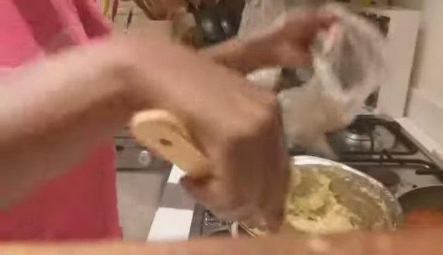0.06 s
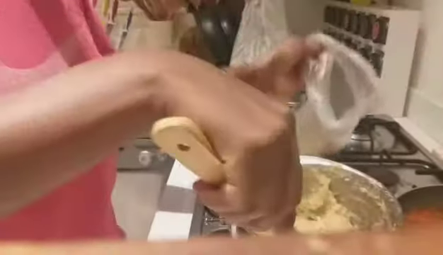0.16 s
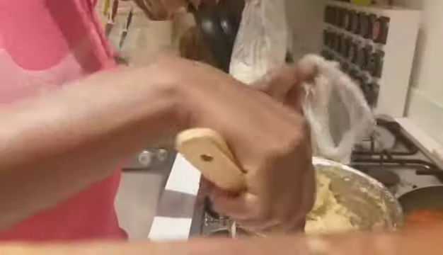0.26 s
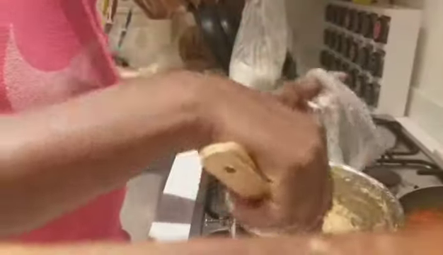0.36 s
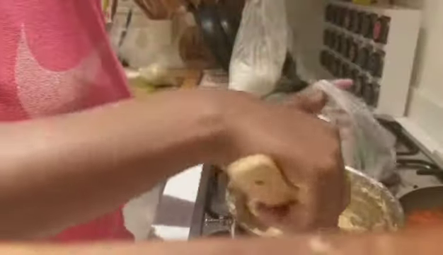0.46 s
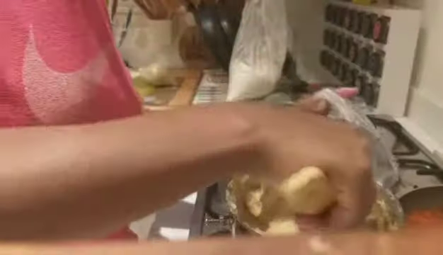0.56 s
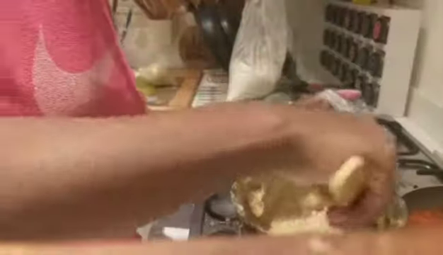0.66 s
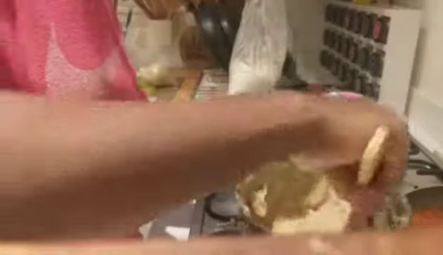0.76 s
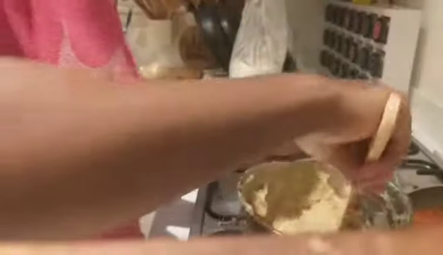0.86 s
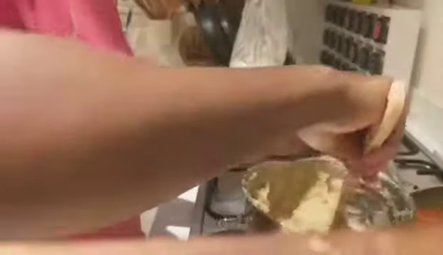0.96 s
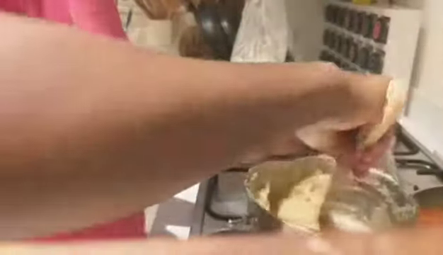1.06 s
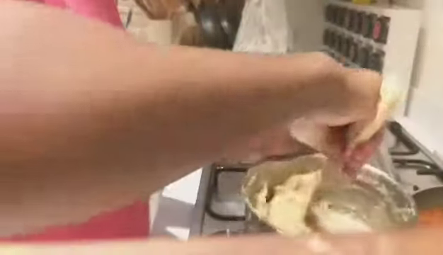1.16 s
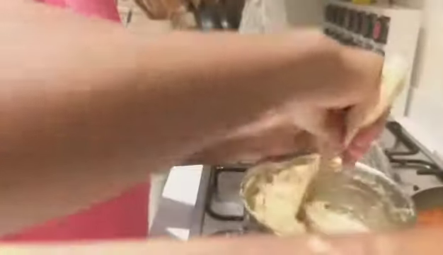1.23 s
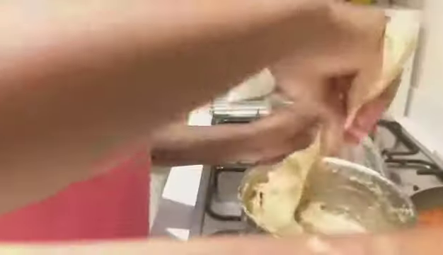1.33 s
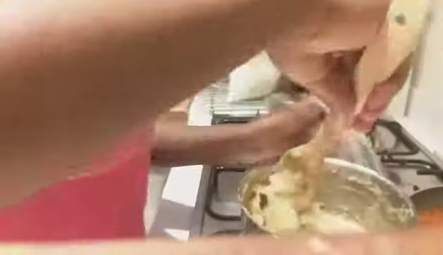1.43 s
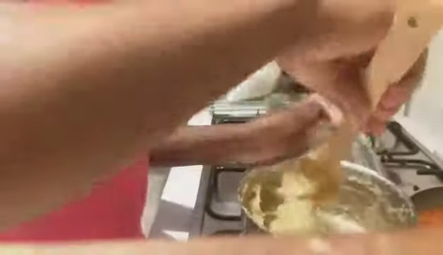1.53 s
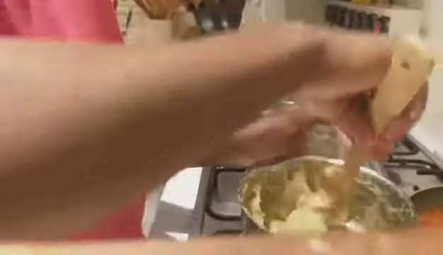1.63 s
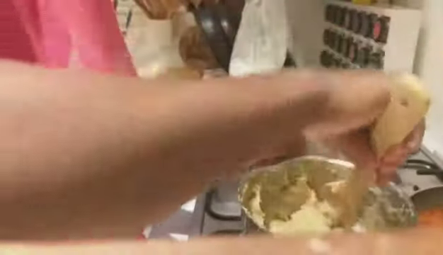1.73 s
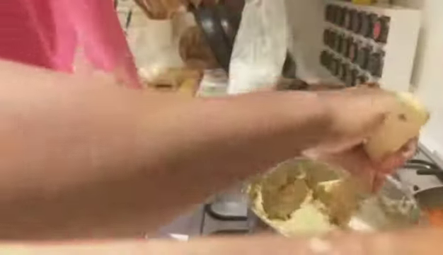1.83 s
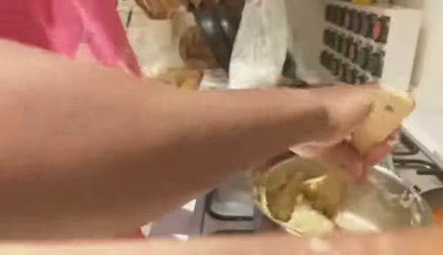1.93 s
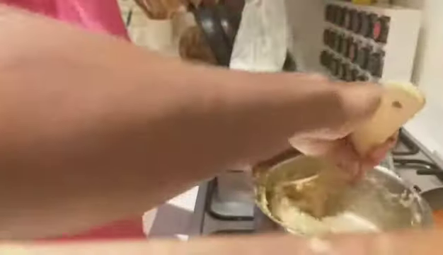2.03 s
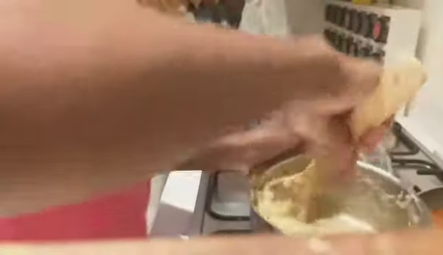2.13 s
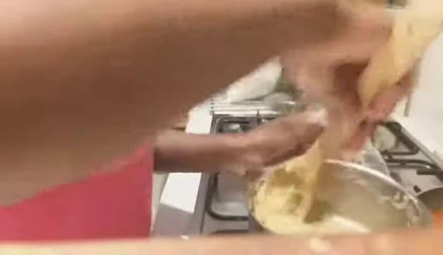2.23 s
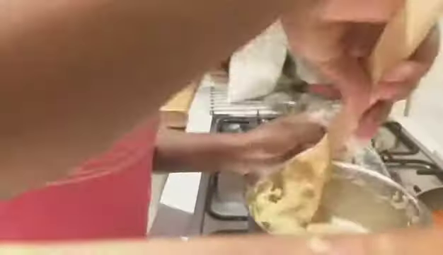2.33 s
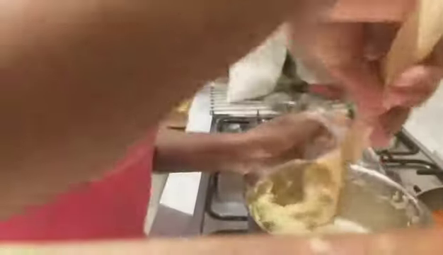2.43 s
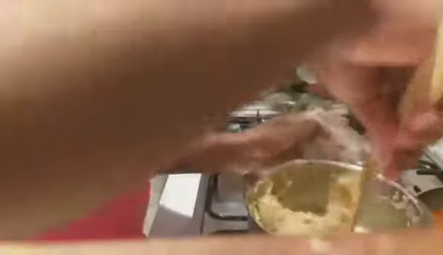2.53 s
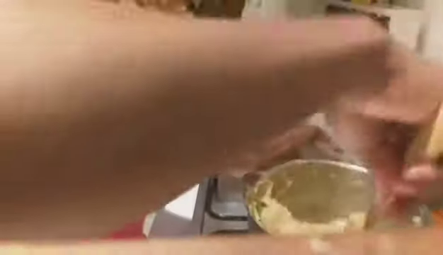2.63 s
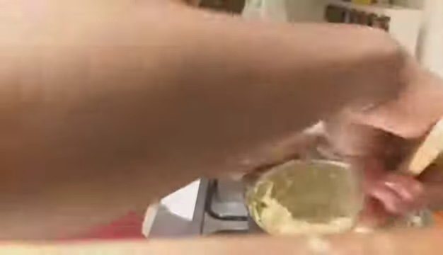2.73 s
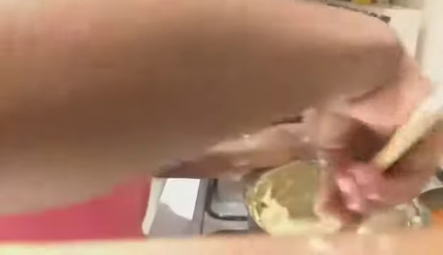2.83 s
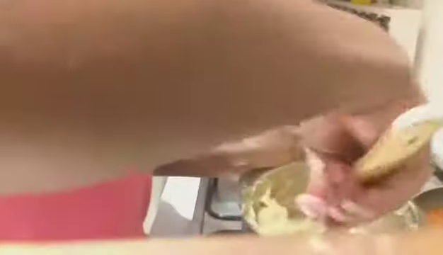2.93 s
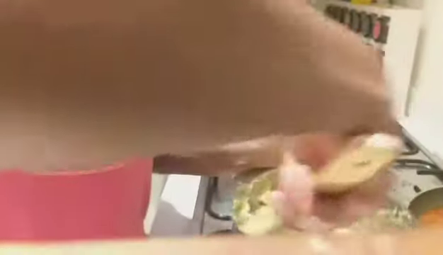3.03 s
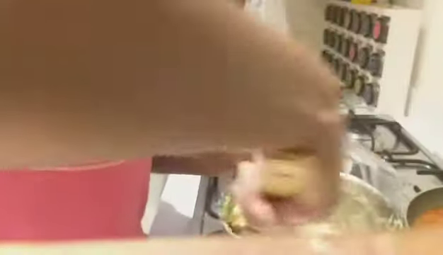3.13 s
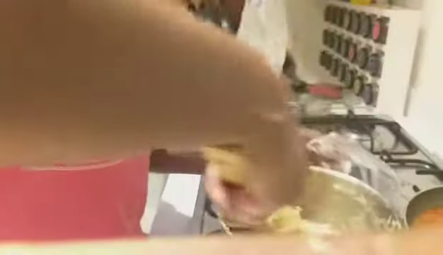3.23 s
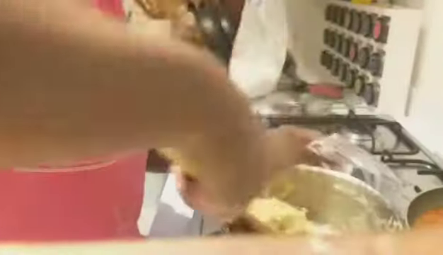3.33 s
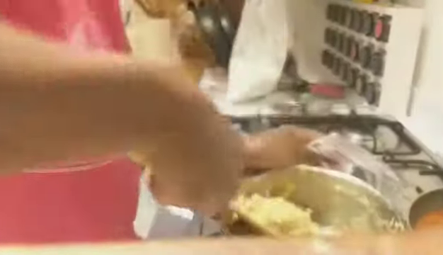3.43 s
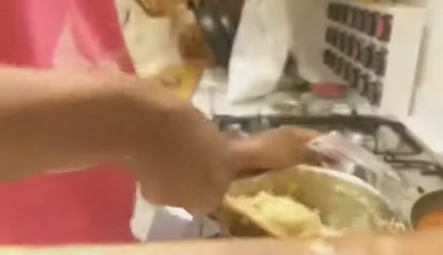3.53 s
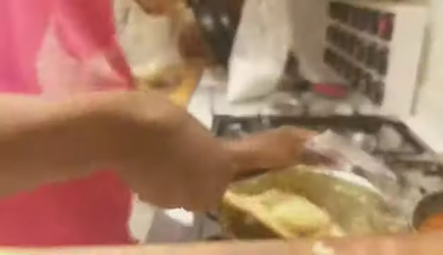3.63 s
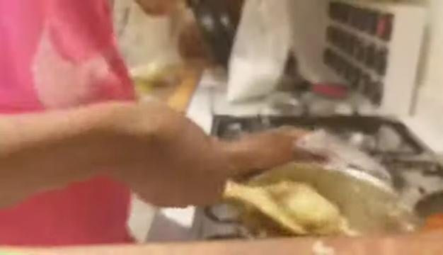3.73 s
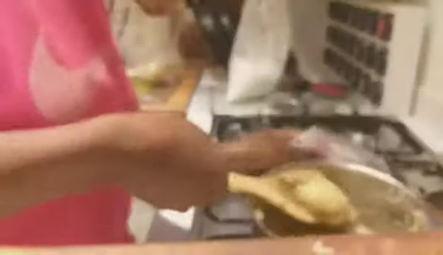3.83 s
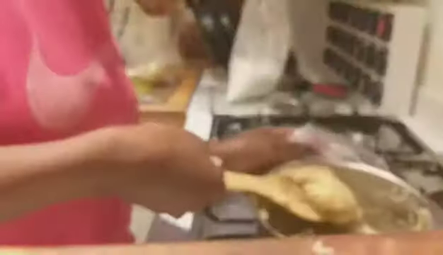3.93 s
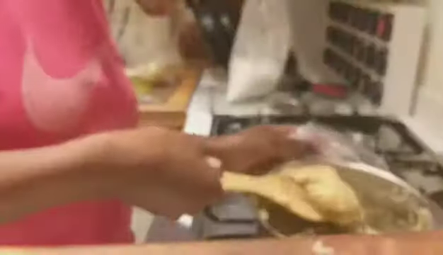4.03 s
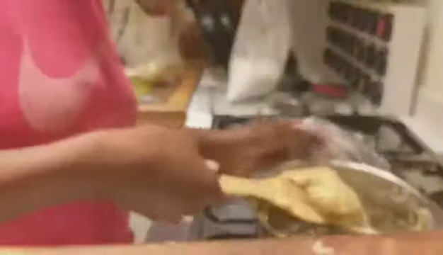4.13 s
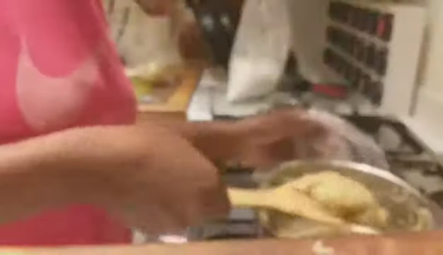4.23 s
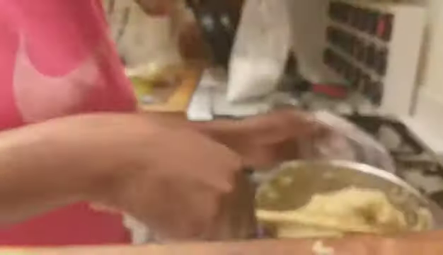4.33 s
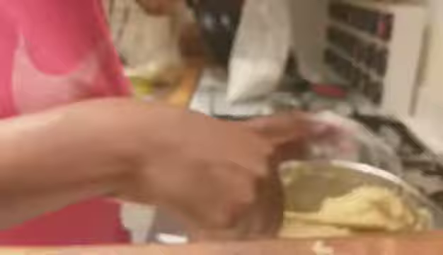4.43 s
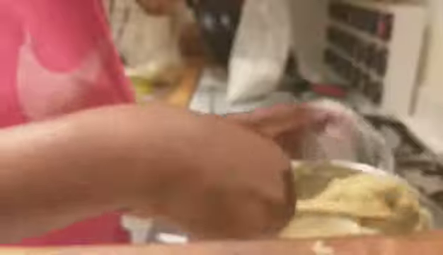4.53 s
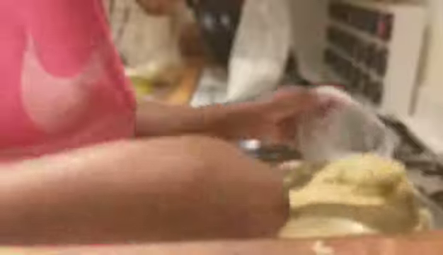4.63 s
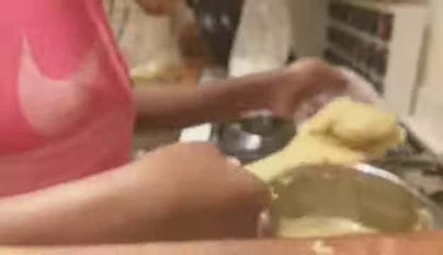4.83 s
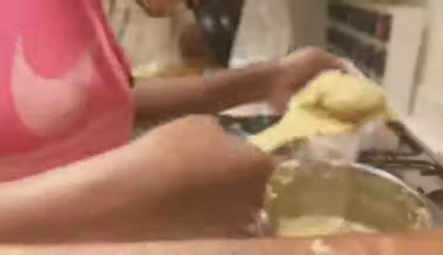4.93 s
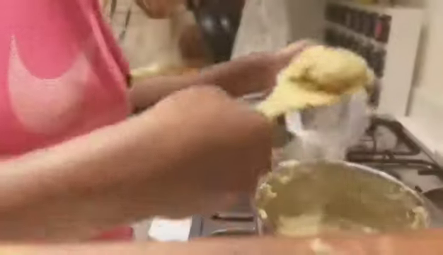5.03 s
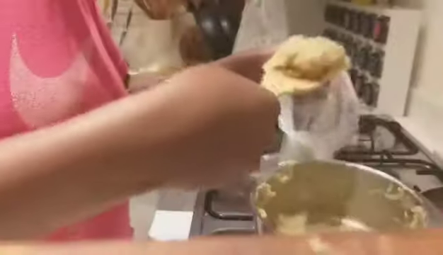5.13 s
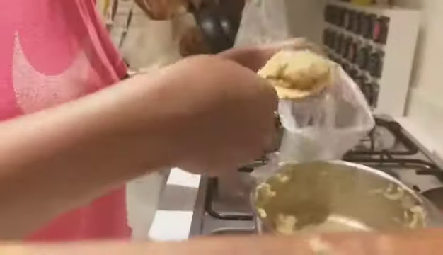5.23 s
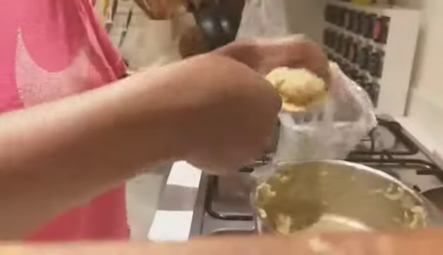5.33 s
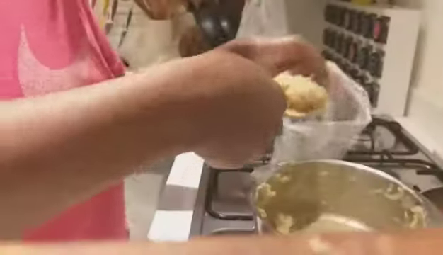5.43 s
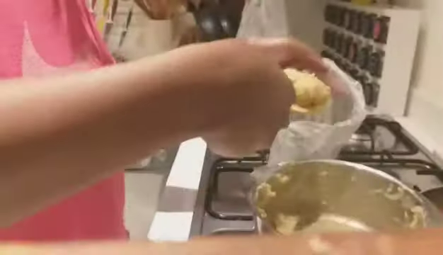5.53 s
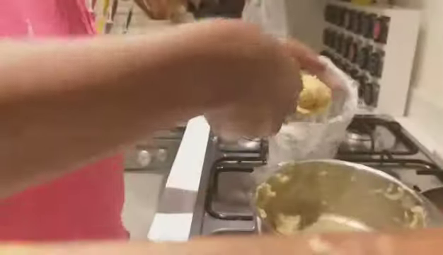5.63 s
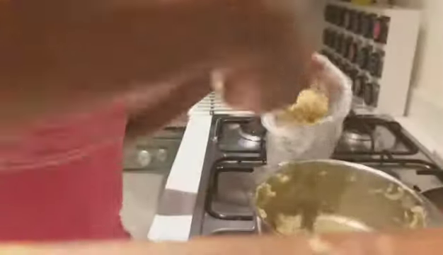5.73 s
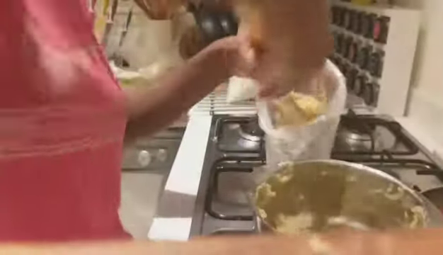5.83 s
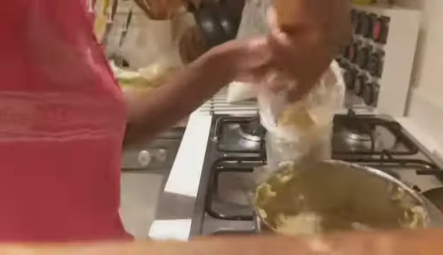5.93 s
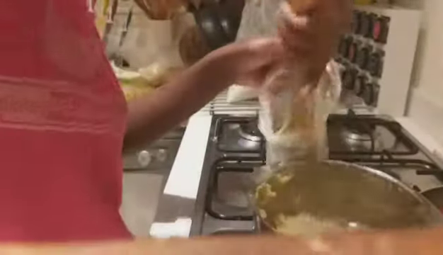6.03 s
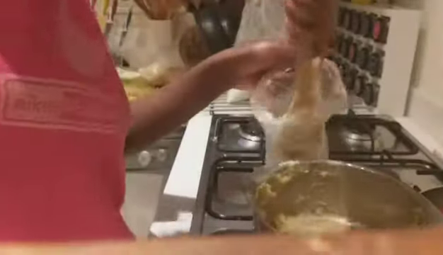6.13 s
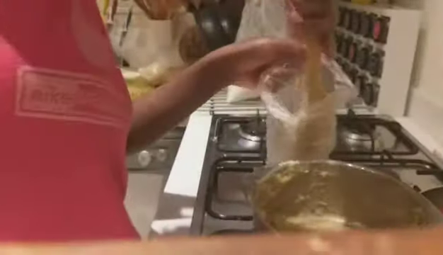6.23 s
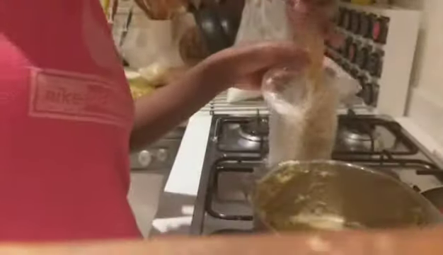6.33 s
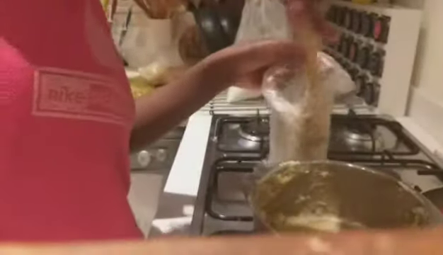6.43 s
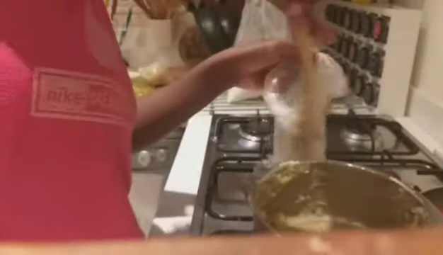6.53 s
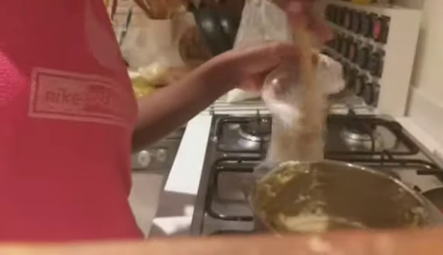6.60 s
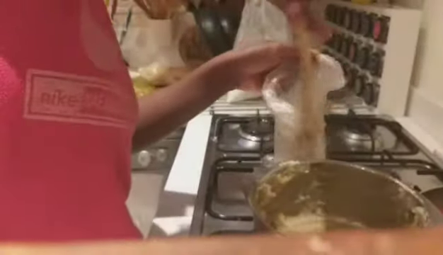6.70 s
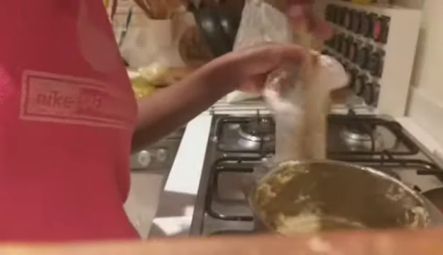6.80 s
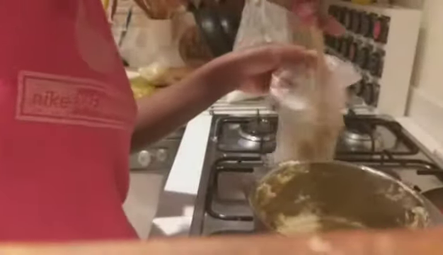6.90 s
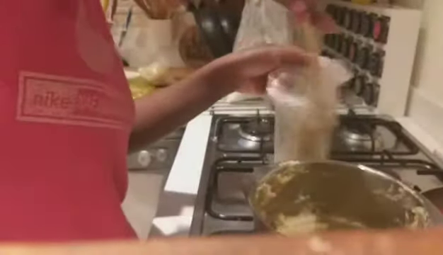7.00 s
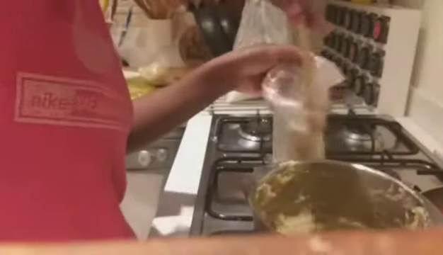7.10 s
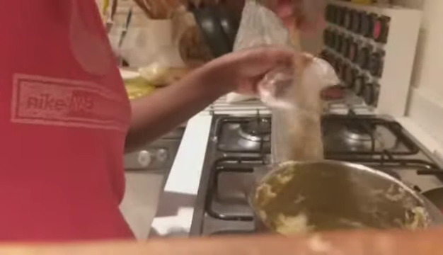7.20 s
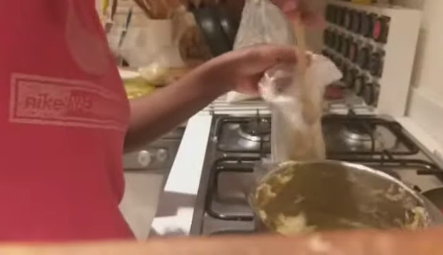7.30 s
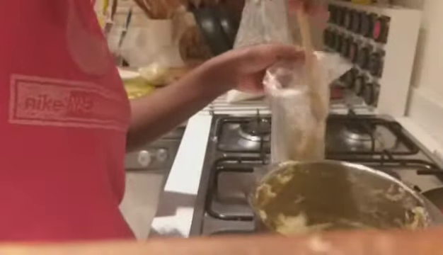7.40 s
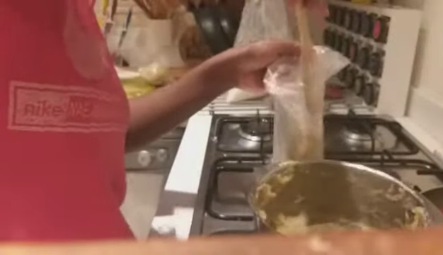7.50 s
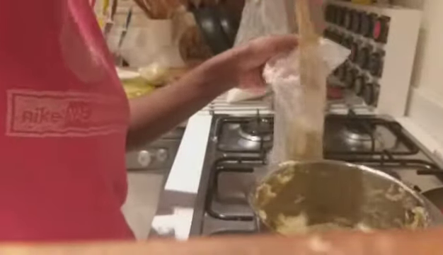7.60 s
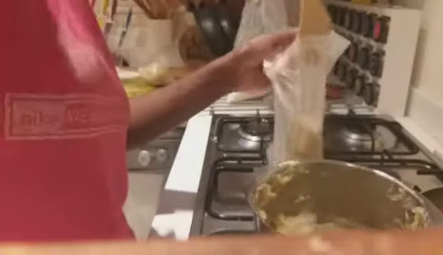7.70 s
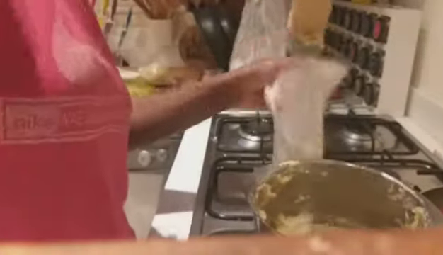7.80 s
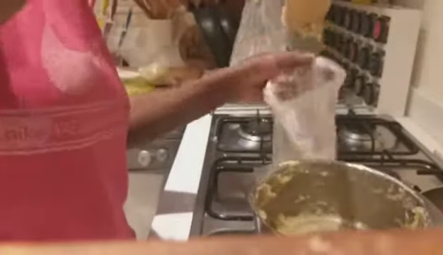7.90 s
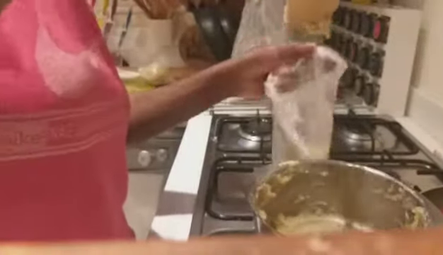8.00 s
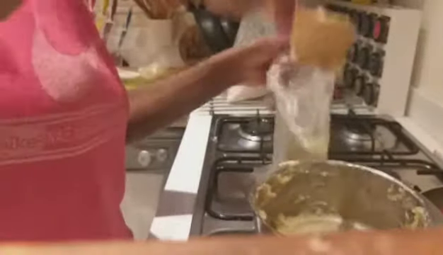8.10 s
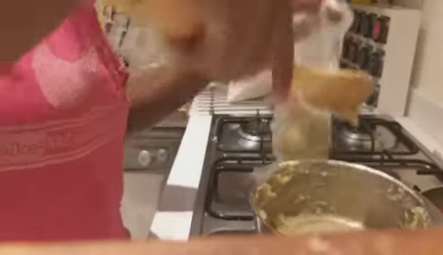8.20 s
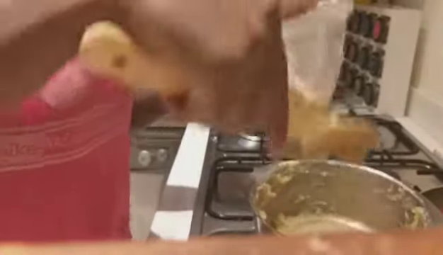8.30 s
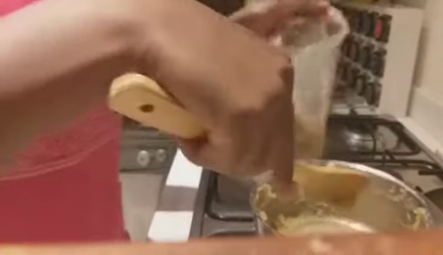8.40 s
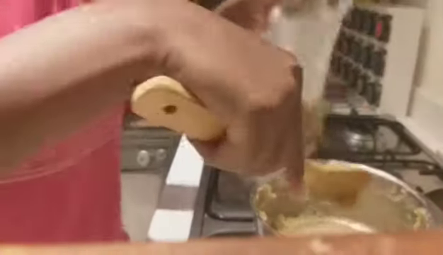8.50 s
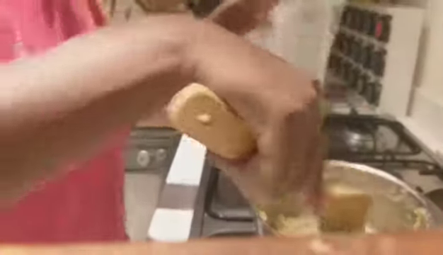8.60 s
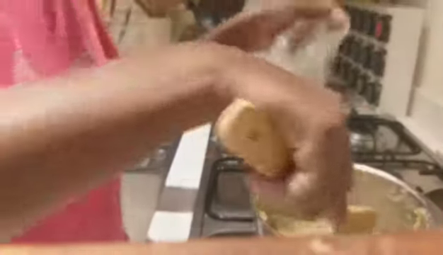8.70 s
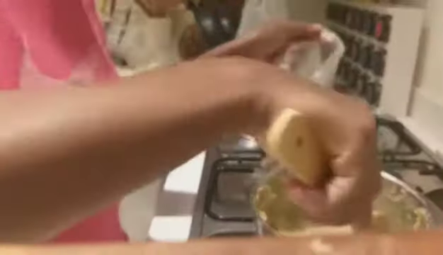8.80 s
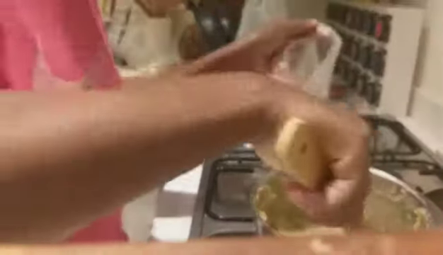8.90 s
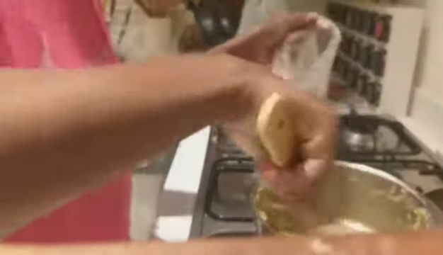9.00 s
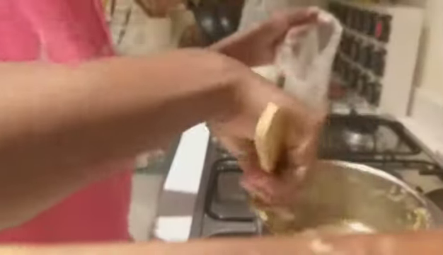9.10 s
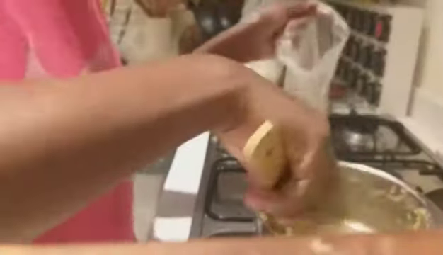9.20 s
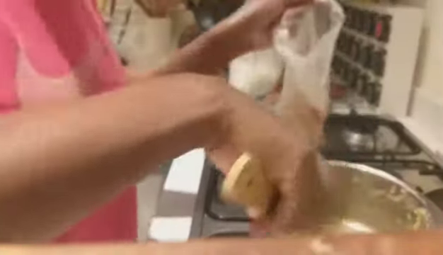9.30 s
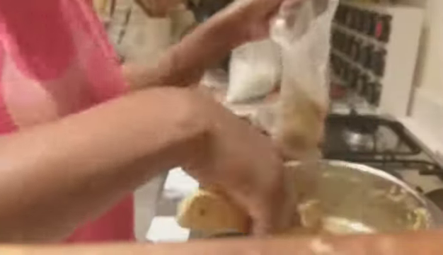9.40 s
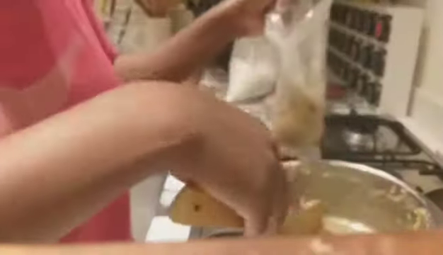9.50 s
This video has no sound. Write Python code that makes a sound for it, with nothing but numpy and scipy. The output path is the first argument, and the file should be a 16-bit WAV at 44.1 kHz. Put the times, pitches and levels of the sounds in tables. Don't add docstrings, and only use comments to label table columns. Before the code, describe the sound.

A close, nearly mono microphone in a hard-walled kitchen, with a faint low appliance hum throughout. From 0 to 0.7 s a thin plastic bag rustles open lightly. A wooden spoon knocks softly through food at 0.8 s, more firmly at 1.05 s, then hits bare steel at 1.2 s, the loudest blow, ringing brightly with a quick rebound. Another double knock comes at 1.9 s, with light drags around it. At 2.9 to 3.3 s the spoon scrapes with a high steady squeal; at 3.6 to 4 s a lower, rising, louder squeak comes with gritty snaps. It quiets, then the bag crackles gently from 4.5 s as it is lifted and filled. A sharp snap and knock at 6 s lead to denser crackling, strongest around 6.6 to 7.3 s, then scattered shakes and a hard tug at 8.4 s. A soft thud at 8.8 s and a faint pot tap at 9.45 s end it.

```python
import sys
import numpy as np
from scipy import signal
from scipy.fft import rfft, irfft, next_fast_len
from scipy.io import wavfile

SR = 44100
rng = np.random.default_rng(int(sys.argv[2]) if len(sys.argv) > 2 else 0)


def log_audio(samples):
    frames = np.atleast_2d(samples).T
    limited = np.clip(frames, -1, 1)
    pcm = np.round(limited * 32767).astype(np.int16)
    wavfile.write(sys.argv[1], SR, pcm)


def voltage_ratio(level):
    return 10 ** (np.asarray(level, float) / 20)


N = 421155

# t/s, peak level/dB, grate thump re peak/dB, crack re peak/dB, body f/Hz
DULL_KNOCKS = [
    (0.756, -28.5, -11, -1.5, 570),
    (0.789, -36, -15, -11.5, 579),
    (1.059, -21, -8.5, -5.5, 676),
    (1.744, -42.5, -11, 3.5, 820),
    (1.892, -20.5, -15, 1, 660),
    (5.992, -30.5, -37, 6.5, 640),
]
# t/s, peak level/dB, grate thump re peak/dB, steel ring re peak/dB, body f/Hz
BARE_STRIKES = [
    (1.198, -13, -18, 5.5, 608),
    (1.235, -17.5, -24, -2.5, 1387),
    (1.936, -18, -16.5, -11, 650),
    (9.448, -29.5, -5, 4, 704),
]
# f/Hz, level/dB, t60/s
WALL_MODES = [(4460, -5.5, .025), (4430, -13, 0.25), (4470, -9.5, 0.26), (4350, -14, 0.24),
              (4590, -13, .15), (4440, -2.5, 0.073), (5650, -9, .09), (5970, -3, 0.025),
              (6500, -7.5, 0.023), (6520, -9, .12), (6680, -4, 0.019), (7990, -7.5, 0.13),
              (8300, -16.5, 0.03)]
# f/Hz, level/dB, t60/s
GRATE_MODES = [(155, 3.5, 0.17), (184, 6, 0.12), (214, 4, 0.12), (323, 3.5, 0.091)]
# f/Hz, level/dB, t60/s
HOLLOW_MODES = [(342, -6.5, 0.045), (640, -8, 0.025), (1383, -9, 0.043)]


def knocks():
    blows = []
    for s, db, thump_db, crack_db, hz in DULL_KNOCKS:
        rise_s = 0.0034 * voltage_ratio(-1.2 * crack_db)
        blows.append((s, db, thump_db, crack_db, -42, hz, rise_s))
    for s, db, thump_db, steel_db, hz in BARE_STRIKES:
        crack_db = 0.9 + 0.3 * steel_db
        blows.append((s, db, thump_db, crack_db, steel_db, hz, 0.00031))
    out, size = np.zeros(N + SR), SR // 4
    for s, db, thump_db, crack_db, ring_db, body_hz, rise_s in blows:
        noise = rng.standard_normal(size)
        touch = contact(noise, 0.0035, rise_s)
        thud = contact(noise, 0.015, rise_s)
        body = band(thud, 0.72 * body_hz, 1.316 * body_hz)
        body += voltage_ratio(-2.0 + 0.33 * crack_db) * band(band(thud, 190, 2400), 180, 3200)
        body += voltage_ratio(-32) * modes(thud, HOLLOW_MODES, 0.49)
        crack = band(touch, 1500, 8000) + voltage_ratio(-13) * band(touch, 11000, 12000)
        sound = voltage_ratio(26.5) * body + voltage_ratio(crack_db + 21.5) * crack
        for hz, mode_db, t60 in GRATE_MODES + WALL_MODES:
            mode_db += rng.normal(0, 2.0)
            mode_db += thump_db - 3 if hz < 400 else ring_db - 6.5
            sound += voltage_ratio(mode_db) * ring(touch, hz, t60)
        start = round(s * SR)
        out[start:start + size] += voltage_ratio(db) * sound
    return band(out[:N], 120, 18000)


# t/s, slip rate f/Hz, first partial level/dB, second partial re first/dB (sharpness)
SQUEAL_STROKES = [
    [(2.87, 2117, -67, -6.5), (2.92, 2147, -43, -14.5), (2.948, 2105, -26.5, 0.5),
     (2.976, 2092, -23.5, 1.5), (3.04, 2095, -26, -4.5), (3.105, 2088, -32, 7), (3.152, 2096, -24, -9.5),
     (3.232, 2100, -34.5, -14), (3.4, 2089, -69.5, -3)],
    [(3.57, 1750, -74, -19.5), (3.6, 1790, -35.5, -11), (3.646, 1752, -27, 4.5), (3.7, 1767, -29.5, -4),
     (3.738, 1759, -20, 3), (3.78, 1829, -16.5, -9.5), (3.834, 1810, -28.5, -8.5), (3.93, 1822, -21, -4),
     (4.28, 1835, -74.5, -18.5)],
]
# multiple of the slip rate, level re third partial/dB
SLIP_OVERTONES = [(4, -4.5), (5, -11.5), (6, -23.5), (7, -18.5), (8, -19.5)]
# t/s, hold/s, level/dB, f/Hz
SHORT_SLIPS = [
    (0.65, .005, -39.5, 1777),
    (0.69, 0.11, -55.5, 1763),
]
# t/s, hold/s, level/dB, f/Hz
SINGING_WALL = [
    (3.714, 0.066, -36, 4454),
    (3.864, .064, -30, 4430),
]


def squeal():
    first, rest = np.zeros(N), np.zeros(N)
    flutter = [voltage_ratio(3.0 * drift(55)) for _ in range(8)]
    waver = 1 + 0.004 * drift(40) + 0.007 * drift(250)
    for stroke, third_db in zip(SQUEAL_STROKES, [-20, -10.5]):
        span, hz, db1, sharp_db, on = in_time(stroke)
        db2 = db1 + sharp_db
        db3 = db1 + third_db + 0.69 * sharp_db
        phase = 2 * np.pi * np.cumsum(hz * waver[span]) / SR
        first[span] += on * voltage_ratio(db1 + 2.5) * flutter[0][span] * np.sin(phase)
        rest[span] += on * voltage_ratio(db2 + 3.0) * flutter[1][span] * np.sin(2 * phase)
        for k, db in [(3, 0)] + SLIP_OVERTONES:
            rest[span] += on * voltage_ratio(db3 + db + 4.5) * flutter[k - 1][span] ** 1.2 * np.sin(k * phase)
    first += tones(SHORT_SLIPS, (630, 500), waver, flutter[0])
    rest += tones(SINGING_WALL, (810, 162), waver ** 1.3, flutter[5])
    return first, rest


# t/s, hold/s, body level/dB, bright part re body/dB, body centre f/Hz
DRAGS = [
    (1.754, 0.11, -49, -14.5, 780),
    (1.882, 0.0042, -43, -20, 827),
    (2.09, 0.09, -53.5, -10.5, 1404),
    (2.182, .12, -51, -12.5, 1350),
    (2.879, 0.072, -50, -12.5, 735),
    (2.981, .19, -49, 0.5, 897),
    (3.662, 0.13, -53.5, 5.5, 1600),
    (3.75, .2, -40.5, -2, 1201),
]
# f/Hz, width/Hz, level/dB
DRAGGED_POT = [(690, 150, -6.5), (1030, 80, -10), (1465, 150, -5.5), (1820, 500, 3)]
# t/s, hold/s, level/dB, f/Hz
BLADE_CHATTER = [
    (2.9, 0.047, -49.5, 730),
    (2.99, 0.034, -41, 656),
    (3.15, .003, -48, 690),
    (3.74, .07, -47.5, 635.4),
    (3.826, .003, -38, 779),
    (3.9, 0.049, -43, 799),
]
# t/s, hold/s, level/dB, f/Hz
CAUGHT_MODES = [
    (2.982, 0.0048, -41, 1425),
    (3.885, .055, -43, 1029),
]


def scrape():
    rub = grains(5000, spread_db=2.5, clump_db=5.5)[:N // 2]
    body = sum(voltage_ratio(db) * rms_one(ring(rub, hz, 5.1 / width)) for hz, width, db in DRAGGED_POT)
    body = rms_one(body + voltage_ratio(-3.0) * rms_one(band(rub, 560, 2200)))
    rocking = band(modes(rub, GRATE_MODES), 140, 260)
    body += voltage_ratio(-14.5) * rms_one(rocking)
    bright = rms_one(band(rub, 2200, 7400))
    bright += voltage_ratio(-0.5) * rms_one(modes(rub, WALL_MODES, 0.19))
    bright += voltage_ratio(-17) * rms_one(band(rub, 11000, 12000))
    out, slow, waver = np.zeros(N), drift(130), 1 + 0.015 * drift(40)
    for s, hold, db, bright_db, hz in DRAGS:
        span, shape_db = swell(s, hold, (900, 590))
        moving = slow[span] * np.sin(2 * np.pi * np.cumsum(hz * waver[span] ** 6.7) / SR)
        rubbed = voltage_ratio(-5.5) * body[span] + voltage_ratio(-3.5) * moving + voltage_ratio(bright_db + 4.5) * bright[span]
        out[span] += voltage_ratio(db + shape_db) * rubbed
    flutter = voltage_ratio(1.5 + 3.8 * drift(40))
    out += tones(BLADE_CHATTER, (650, 420), waver, flutter, second_db=-9.5)
    out += tones(CAUGHT_MODES, (700, 260), np.ones(N), flutter)
    return out


# t/s, peak level/dB
SNAPS = [(0.0524, -40), (0.5804, -36), (2.8737, -27), (3.2802, -55), (3.7265, -21.5), (3.9, -20.5),
         (4.2468, -47), (4.3778, -43), (5.9896, -22.5), (6.6446, -33.5), (7.5834, -40.5), (8.2837, -43),
         (8.4606, -44)]
# t/s, peak level/dB, lowest f/Hz, highest f/Hz
SOFT_THUDS = [
    (1.024, -47.5, 301, 1050),
    (2.681, -45, 220.8, 1237),
    (7.663, -48, 200, 1320),
    (7.882, -52.5, 140, 1304),
    (8.172, -47, 201, 1320),
    (8.414, -51, 140, 1300),
    (8.81, -36.5, 138, 1495),
    (9.444, -39.5, 140, 6000),
]


def ticks():
    out, size = np.zeros(N), SR // 10
    snaps = [(s, db, 3460, 15000) for s, db in SNAPS]
    for table, decay_s, gain_db, hollow_db, grate_db in [(snaps, 0.003, 17, -80, -90),
                                                         (SOFT_THUDS, 0.016, 32, -29, -47)]:
        for s, db, low_hz, high_hz in table:
            touch = contact(rng.standard_normal(size), decay_s)
            sound = band(band(touch, low_hz, high_hz), 0.84 * low_hz, 1.4 * high_hz)
            body = voltage_ratio(hollow_db) * modes(touch, HOLLOW_MODES) + voltage_ratio(grate_db) * modes(touch, GRATE_MODES)
            sound += band(body, 0.9 * low_hz, 9000)
            start = round(s * SR)
            out[start:start + size] += voltage_ratio(db + gain_db) * sound
    return out


# t/s, hold/s, crackle level/dB, fuller folds re crackle/dB
BAG_SHAKEN_OPEN = [
    (0.0, 0.14, -59, -21),
    (0.15, 0.081, -60, -30),
    (0.288, 0.0052, -47.5, -25),
    (0.41, .11, -54, -30),
    (0.6, 0.054, -51, -12.5),
    (0.7, 0.056, -58, 0.5),
]
# t/s, hold/s, crackle level/dB, fuller folds re crackle/dB
BAG_LIFTED = [(4.143, .003, -61, -25), (4.383, 0.0028, -62.5, -14), (4.562, 0.29, -49, -24),
              (4.8, 0.0037, -45, -21), (4.885, 0.17, -52, -26), (5.066, 0.22, -49, -20),
              (5.496, 0.0032, -50, -25), (5.56, 0.41, -56, -25), (6.077, 0.22, -47.5, -18.5),
              (6.26, .05, -44, -16), (6.461, 0.065, -54, -33.5)]
# t/s, hold/s, crackle level/dB, fuller folds re crackle/dB
BAG_SHAKEN_DOWN = [(6.593, 0.34, -44.5, -15), (6.914, 0.18, -41, -11), (7.133, 0.079, -44.5, -16),
                   (7.289, 0.038, -44, -15), (7.601, 0.061, -50, -28), (7.677, .003, -47.5, -19),
                   (7.844, .01, -47.5, -16), (7.887, .003, -42, -8.5), (8.143, 0.052, -50, -13.5),
                   (8.33, 0.0086, -48, -27), (8.441, 0.0027, -39.5, -6.5), (8.552, 0.19, -51.5, -22),
                   (8.802, 0.022, -49.5, -18), (8.974, 0.046, -60, -20)]
# t/s, hold/s, crackle level/dB, fuller folds re crackle/dB
BAG_TUGS = [
    (0.054, 0.0034, -53, -19),
    (5.978, .002, -42, -22),
    (6.65, 0.0034, -38.5, -10.5),
    (8.43, .003, -33.5, -13.5),
]
# t/s, hold/s, crackle level/dB
BAG_HELD = [
    (0.74, .003, -69),
    (1.26, 0.16, -64.5),
    (1.778, .03, -59),
    (1.92, 0.12, -58),
    (2.399, 0.28, -71.5),
    (2.8, .003, -57),
    (2.936, 0.16, -64.5),
    (3.78, 0.032, -50.5),
    (4.05, .07, -69),
]
# f/Hz, level/dB
FILM_SPECTRUM = [(710, -48.5), (1200, -15.5), (1340, -23), (1640, -7), (2130, -12.5), (3080, -2), (6950, 5),
                 (10300, -4.5), (12500, 1), (14800, 4.5), (16000, -13)]
# f/Hz, level/dB
FOLD_SPECTRUM = [(180, -46.5), (300, -15.5), (444, -15.5), (531, -4), (849, -12), (1040, -4), (2300, -3.5),
                 (2990, -8.5), (5060, -120)]


def bag():
    film = coloured(grains(3500, spread_db=0.5, clump_db=2.5), FILM_SPECTRUM)
    folds = coloured(grains(2500, spread_db=2.5, clump_db=2.0), FOLD_SPECTRUM)
    crackle, fold = np.full(N, voltage_ratio(-81)), np.zeros(N)
    handled = BAG_SHAKEN_OPEN + BAG_LIFTED + BAG_SHAKEN_DOWN
    held = [(*row, -40) for row in BAG_HELD]
    for rows, rates in [(handled, (213, 90)), (BAG_TUGS, (430, 670)), (held, (110, 53))]:
        for s, hold, db, fold_db in rows:
            span, shape_db = swell(s, hold, rates)
            crackle[span] = np.maximum(crackle[span], voltage_ratio(db + 0.8 + shape_db))
            fold_level = voltage_ratio(db + fold_db - 0.47 + 2.2 * shape_db)
            fold[span] = np.maximum(fold[span], fold_level)
    return crackle * film + fold * folds


# f/Hz, level/dB
HUM_SPECTRUM = [(15, -41.5), (25, -13), (134, 8), (212, 2), (301, -8), (531, -5), (591, -7.5), (1840, -16),
                (2480, -33.5), (7310, -10), (9840, -27), (14400, -20.5), (16000, -14.5)]


def hum():
    return voltage_ratio(-67.5) * coloured(rng.standard_normal(N), HUM_SPECTRUM) * voltage_ratio(1.5 * drift(4))


# f/Hz, t60/s
ROOM_DECAY = [(150, 0.34), (1000, 0.32), (4000, 0.39), (12000, 0.19)]


def kitchen(x):
    t, tail = np.arange(SR // 2) / SR, 0
    for low in 60 * 2 ** np.arange(8):
        decay = voltage_ratio(-60 * t / at_hz(ROOM_DECAY, 1.4 * low))
        tail = tail + band(rng.standard_normal(len(t)), low, 2 * low) * decay
    tail *= np.clip((t - 0.003) / 0.0056, 0, 1)
    return signal.fftconvolve(x, tail / np.sqrt(np.sum(tail ** 2)))[:N]


def contact(noise, decay_s, rise_s=0.00036):
    t = np.arange(len(noise)) / SR
    touch = noise * np.exp(-t / decay_s) * np.minimum(t / rise_s, 1)
    return touch / np.sqrt(np.sum(touch ** 2))


def ring(x, hz, t60):
    r, w = voltage_ratio(-60 / (t60 * SR)), 2 * np.pi * hz / SR
    return signal.lfilter([0, np.sin(w)], [1, -2 * r * np.cos(w), r * r], x + 1e-18)


def modes(x, table, sustain=1):
    return sum(voltage_ratio(db) * ring(x, hz, sustain * t60) for hz, db, t60 in table)


def grains(per_s, spread_db, clump_db):
    sizes = voltage_ratio(spread_db * np.minimum(rng.exponential(1, N), 5)) * rng.choice([-1, 1], N)
    happens = rng.random(N) < per_s * voltage_ratio(clump_db * drift(45)) / SR
    return rms_one(sizes * happens)


def swell(s, hold, rates):
    rise, fall = rates
    start = max(round((s - 45 / rise) * SR), 0)
    stop = min(round((s + hold + 45 / fall) * SR), N)
    t = np.arange(start, stop) / SR
    return slice(start, stop), -rise * np.maximum(s - t, 0) - fall * np.maximum(t - s - hold, 0)


def tones(rows, rates, waver, flutter, second_db=-90):
    out = np.zeros(N)
    for s, hold, db, hz in rows:
        span, shape_db = swell(s, hold, rates)
        phase = 2 * np.pi * np.cumsum(hz * waver[span]) / SR
        wave = np.sin(phase) + voltage_ratio(second_db) * np.sin(2 * phase)
        out[span] += voltage_ratio(db + shape_db) * flutter[span] * wave
    return out


def in_time(rows):
    s, *columns = np.transpose(rows)
    span = slice(max(round(s[0] * SR), 0), min(round(s[-1] * SR), N))
    t = np.arange(span.start, span.stop) / SR
    on = np.clip(np.minimum(t - s[0], s[-1] - t) / 0.0059, 0, 1)
    return [span] + [np.interp(t, s, c) for c in columns] + [on]


def drift(rate):
    r = np.exp(-16 * np.pi * rate / SR)
    slow = signal.lfilter([1], [1, -2 * r, r * r], rng.standard_normal(N // 8 + 2))
    return np.interp(np.arange(N) / 8, np.arange(len(slow)), rms_one(slow))


def coloured(x, spectrum):
    size = next_fast_len(N)
    hz = np.arange(1, size // 2 + 2) * SR / size
    return rms_one(irfft(rfft(x, size) * voltage_ratio(at_hz(spectrum, hz)), size)[:N])


def at_hz(points, hz):
    table_hz, value = np.transpose(points)
    return np.interp(np.log(hz), np.log(table_hz), value)


def band(x, low_hz, high_hz):
    edges = [low_hz, min(high_hz, 0.45 * SR)]
    return signal.sosfilt(signal.butter(2, edges, "band", fs=SR, output="sos"), x)


def rms_one(x):
    return x / np.sqrt(np.mean(x ** 2) + 1e-20)


def scene():
    blows = band(knocks() + ticks(), 110, 18000)
    first, overtones = squeal()
    rubbing, rustle = scrape() + overtones, bag()
    wet = kitchen(voltage_ratio(-1.5) * blows + voltage_ratio(-9) * rubbing + voltage_ratio(-11.5) * rustle + voltage_ratio(-13.5) * first)
    return (blows + rubbing + rustle + hum() + wet + first) * np.ones((2, 1))


# low f/Hz, high f/Hz, side level re middle/dB, sign
MICROPHONE_PORTS = [
    (1600, 2250, -13, 1),
    (9300, 10200, -16, -1),
]


def top_cut(x):
    return signal.sosfilt(signal.butter(12, 16830, fs=SR, output="sos"), x)


def record(dry):
    x = signal.sosfilt(signal.butter(2, 60, "high", fs=SR, output="sos"), dry)
    x = x + voltage_ratio(-82) * signal.lfilter([1], [1, -0.97], rng.standard_normal(N)) / 6
    side = voltage_ratio(-82) * rng.standard_normal(N)
    for low_hz, high_hz, db, sign in MICROPHONE_PORTS:
        side += sign * voltage_ratio(db) * band(band(x[0], low_hz, high_hz), 0.9 * low_hz, 1.1 * high_hz)
    x = x + side * np.array([[1], [-1]])
    x = signal.sosfilt(signal.cheby2(12, 50, 16300, fs=SR, output="sos"), x)
    return top_cut(x)


dry = scene()
out = record(dry)
log_audio(out)
```